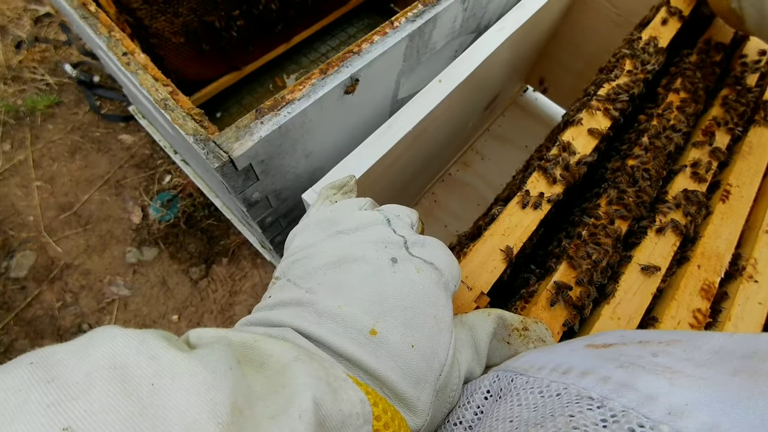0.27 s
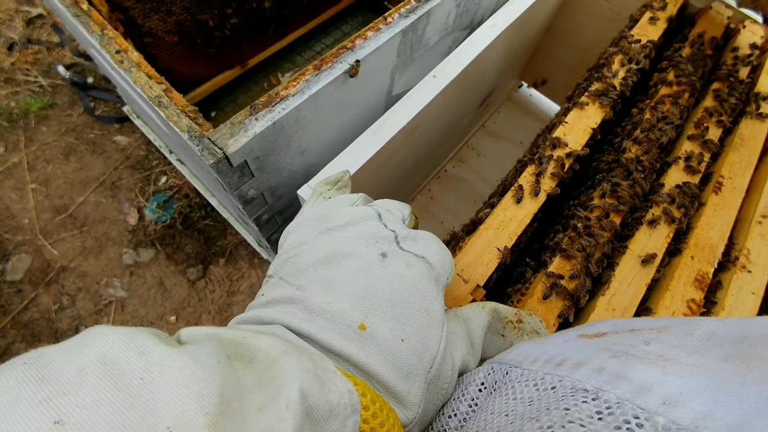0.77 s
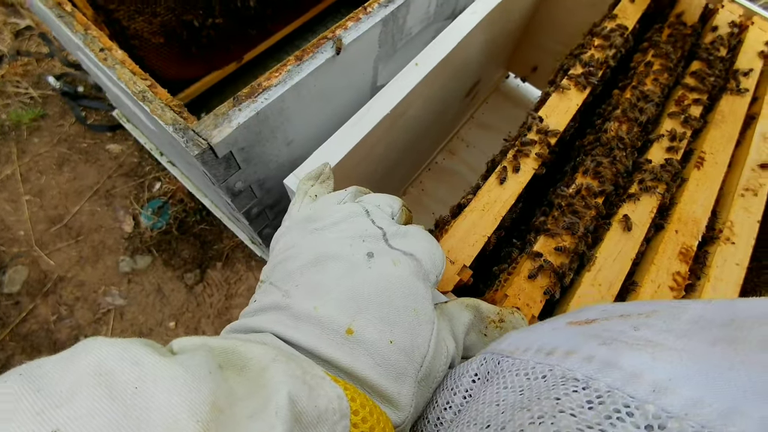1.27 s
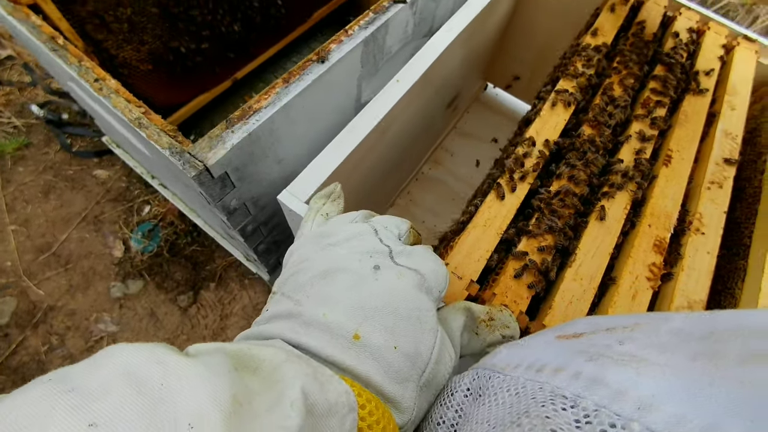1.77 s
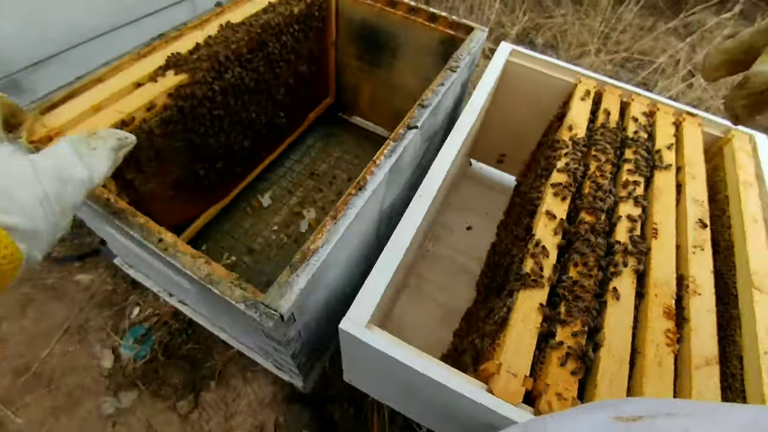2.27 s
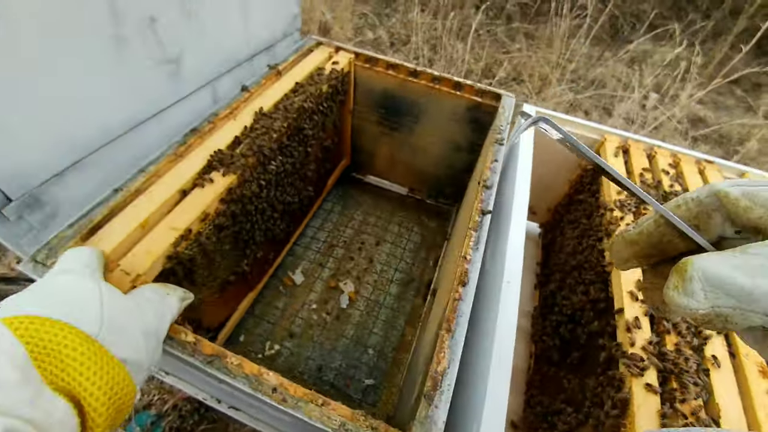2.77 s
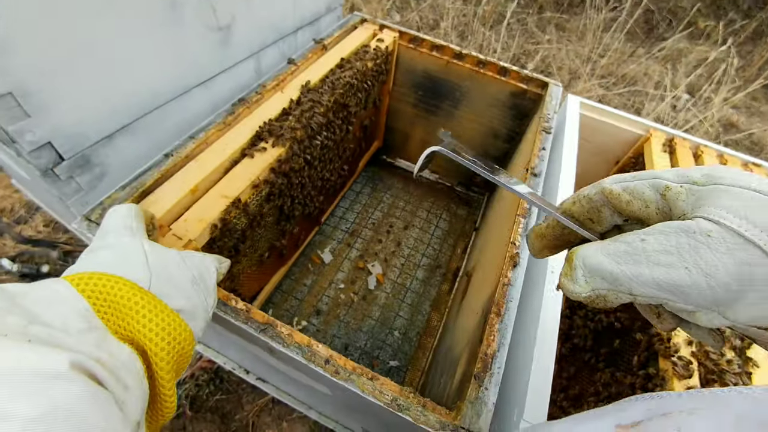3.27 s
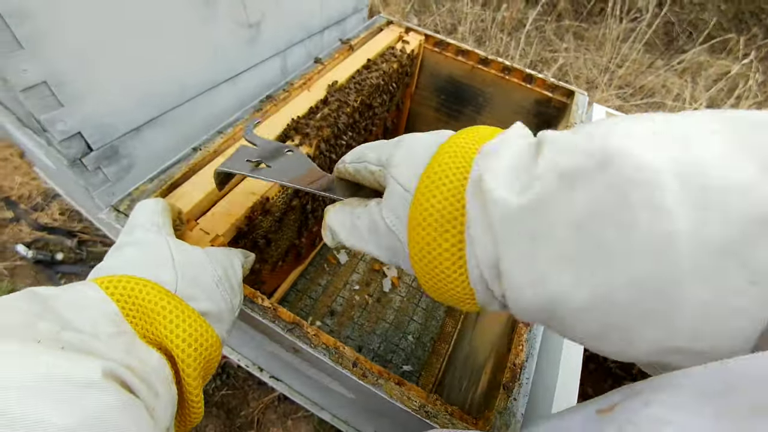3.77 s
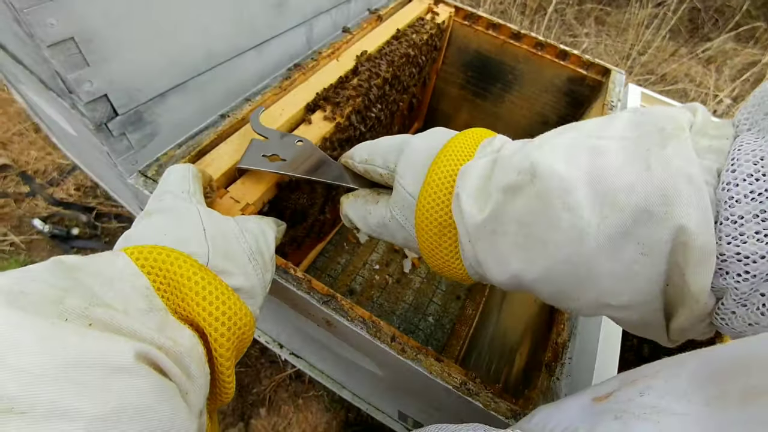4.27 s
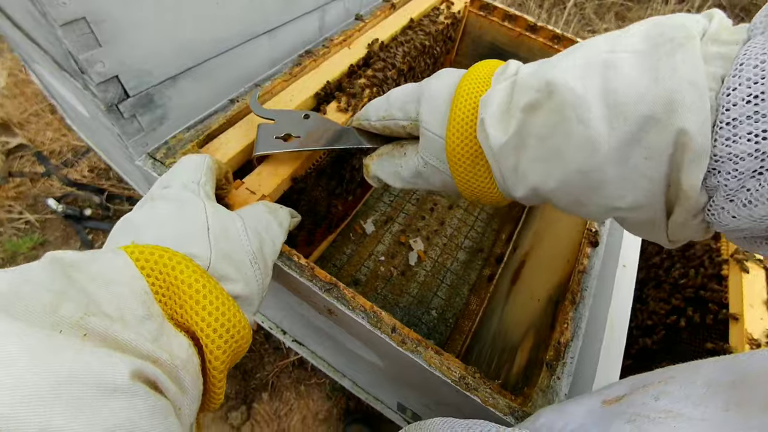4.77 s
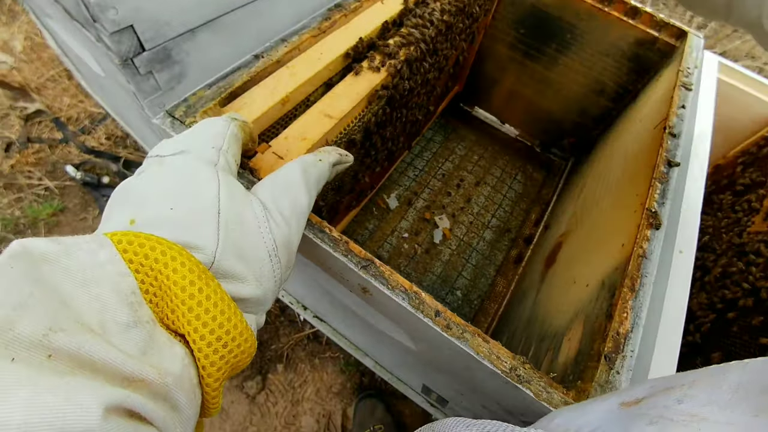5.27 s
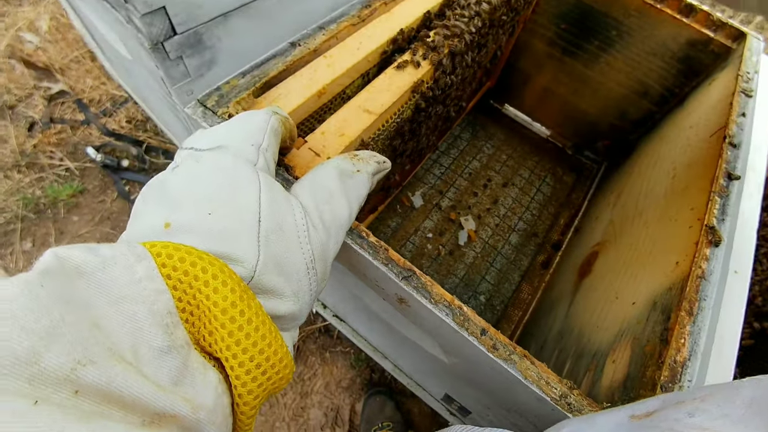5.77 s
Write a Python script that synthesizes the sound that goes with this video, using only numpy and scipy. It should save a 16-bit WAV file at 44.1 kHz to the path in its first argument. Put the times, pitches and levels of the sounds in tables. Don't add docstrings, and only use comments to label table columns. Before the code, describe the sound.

A swarm hums continuously around 200 Hz and its harmonics, close and slightly fluttering, over thin hiss and soft low wind bumps in a dry open field. The hum is boxier during the first two seconds, then more open. At 0.7 s a wooden frame drops into a hollow box: a very loud double hit and quick bounce, flattened by overload, with millisecond high squeals; the treble thins briefly afterward. Soft low thuds settle around 1.6 s, with gloves rustling and small tool ticks near 2.0-2.5 s. Around 2.7-3.4 s come dull bumps and wind puffs, and a bee whizzes very close about 3.0-3.15 s. A long sleeve brush passes at 3.7 s. Gentle prying knocks come at 4.1-4.4 s, then a firm short scrape at 4.6 s and sharper wooden knocks at 4.7-4.8 s. Tiny metallic ticks follow at 5.1-5.3 s, with soft thuds near 5.9 s as bees continue buzzing.

```python
import sys
import numpy as np
from scipy import signal
from scipy.fft import rfft, irfft, next_fast_len
from scipy.io import wavfile
from scipy.ndimage import uniform_filter1d, map_coordinates

SR = 44100
rng = np.random.default_rng(int(sys.argv[2]) if len(sys.argv) > 2 else 0)


def boost_factor(decibels):
    exponent = np.asarray(decibels, float) / 20
    return 10 ** exponent


def persist_wave(psi):
    counts = np.round(np.clip(psi, -1, 1) * 32767).astype(np.int16)
    wavfile.write(sys.argv[1], SR, np.atleast_2d(counts).T)


N = 265217


def unit(x):
    return x / np.sqrt(np.mean(x ** 2) + 1e-20)


def along(points, hz):
    f, v = np.transpose(points)
    return boost_factor(np.interp(np.log(hz + 1), np.log(f + 1), v))


def wobble(rate, count=1):
    knots = rng.standard_normal((count, 400))
    position = np.arange(0, N + 64, 64) * rate / SR
    return np.array([map_coordinates(k, [position]) for k in knots])


def held_for(x):
    return x.repeat(64, axis=-1)[..., :N]


def filtered(x, response):
    m = next_fast_len(N + SR // 2)
    return irfft(rfft(x, m) * response(np.fft.rfftfreq(m, 1 / SR)), m)[:N]


def resonances(modes):
    return lambda f: sum(boost_factor(db) * 1j * f * w / (c * c - f * f + 1j * f * w) for c, w, db in modes)


def rush(spectrum):
    return unit(filtered(rng.standard_normal(N), lambda hz: along(spectrum, hz)))


def ring(modes, rise, scatter_db):
    hz, db, t60 = np.transpose(modes)[:, :, None]
    t = np.arange(int(t60.max() * SR)) / SR
    level = db + scatter_db * rng.standard_normal(hz.shape) - 60 * t / t60
    x = (boost_factor(level) * np.sin(2 * np.pi * hz * t)).sum(axis=0)
    x = x * (1 - np.exp(-t / rise)) ** 2
    return x / np.abs(x).max()


def add(track, s, x):
    part = track[round(s * SR):][:len(x)]
    part += x[:len(part)]


# (frequency [Hz], density [dB per Hz])
HISS_SPECTRUM = [(1760, -32), (3000, -15.5), (3490, -4), (4010, -2.5), (4760, -5), (5820, -10), (7510, -12),
                 (8500, -10.5), (9430, -15.5), (9890, -25), (10700, -15.5), (11400, -18.5), (12000, -30),
                 (12900, -23), (15600, -35.5)]


def hiss():
    return boost_factor(-73.5) * rush(HISS_SPECTRUM)


# (time [s], half length [s], level [dB])
GUST_TIMES = [(0, 0.072, -51), (0.354, 0.21, -69), (.88, 0.15, -54), (1.2, 0.14, -66), (1.8, 0.13, -57),
              (2.204, 0.2, -56.5), (2.6, .1, -59.5), (2.722, 0.032, -46.5), (2.85, .07, -56),
              (3.022, 0.037, -48), (3.17, 0.092, -53.5), (3.367, 0.03, -42), (3.471, 0.065, -54),
              (3.9, 0.16, -61), (4.149, 0.065, -65), (4.417, 0.05332, -52), (4.552, 0.026, -52.5),
              (4.76, 0.058, -52), (4.96, 0.045, -54.5), (5.3, 0.053, -66), (5.998, 0.038, -57)]
# (frequency [Hz], density [dB per Hz])
WIND_SPECTRUM = [(8.8, -31.5), (15, -4.5), (66, -2), (79, -7), (92, -17), (150, -11), (200, -39.5),
                 (330, -120)]


def wind():
    t = np.arange(N) / SR
    breeze_db = -64
    gusts = sum(boost_factor(db) * np.exp(-((t - s) / half) ** 2) for s, half, db in GUST_TIMES)
    flutter = held_for(boost_factor(2.2 * wobble(11)[0]))
    return boost_factor(2.0) * (boost_factor(breeze_db) + gusts) * unit(flutter * rush(WIND_SPECTRUM))


# (time [s], open-air hum level [dB], box boom level [dB])
SWARM_LEVELS = [(0, -51, -44), (.5, -52, -52), (.7, -47, -45), (.8, -53.5, -40.5), (.95, -49.5, -46),
                (1.3, -49.5, -35), (1.55, -49.5, -44), (1.75, -50.5, -41.5), (2.1, -50, -54),
                (2.95, -51, -67), (3.1, -50.5, -52), (3.3, -54, -55.5), (3.55, -52, -63), (3.8, -52.5, -74),
                (4.27, -55.5, -54.5), (4.85, -52, -58), (5.6, -52.5, -62), (6.01, -54, -52)]
# (frequency [Hz], level [dB])
WING_TONE = [(130, -38.5), (190, -15.5), (260, -11.5), (420, -7.5), (640, -20.5), (950, 0.5), (1300, -13),
             (2200, -21.5), (4800, -41.5), (7000, -59.5)]
# (frequency [Hz], density [dB per Hz])
CROWD_SPECTRUM = [(47, -45), (80, -14.5), (93, -20.5), (221, -3), (264, -16), (332, -4.5), (418, -4),
                  (534, -9.5), (963, -14.5), (2080, -28.5), (2790, -42), (4000, -41.5), (5200, -71),
                  (8800, -120)]
# (frequency [Hz], width [Hz], level [dB])
BOX_AIR = [(345, 54, -0.5), (396, 120, -2)]


def swarm(count):
    time, hum_db, boom_db = np.transpose(SWARM_LEVELS)
    hum_db, boom_db = [np.interp(np.arange(N) / SR, time, db) for db in (hum_db, boom_db)]
    own_beat = 0.065 * rng.standard_normal((count, 1))
    drift = 0.045 * wobble(4, count) + 0.014 * wobble(25, count)
    beats = np.cumsum(held_for(210 * (1 + own_beat + drift) / SR), axis=1)
    strokes = np.diff(np.floor(beats + rng.random((count, 1))), axis=1, prepend=0)
    nearness = boost_factor(2.5 * wobble(4, count) + 5.3 * wobble(22, count))
    bees = (strokes * held_for(nearness)).sum(axis=0)
    near = unit(filtered(bees, lambda hz: along(WING_TONE, hz)))
    far = boost_factor(3.5 + 0.43 * held_for(wobble(7.1)[0])) * rush(CROWD_SPECTRUM)
    boxed = unit(filtered(bees, lambda hz: resonances(BOX_AIR)(hz) ** 2))
    return boost_factor(hum_db) * (boost_factor(-2.0) * near + far) + boost_factor(boom_db - 8.0) * boxed


# (start [s], end [s], level [dB])
ARM_MOVES = [(0.658, 1.902, -65.5), (1.89, 2.597, -61.5), (2.85, 3.245, -66.5), (3.45, 4.003, -69),
             (4.505, 5.15, -64.5), (5.3, 6.103, -67.5)]


def movement():
    t = np.arange(N) / SR
    ease_s, still_db = 0.08, -84.5
    strength = boost_factor(still_db)
    for start, end, db in ARM_MOVES:
        strength = strength + boost_factor(db) * (np.tanh((t - start) / ease_s) - np.tanh((t - end) / ease_s)) / 2
    return strength


# (frequency [Hz], density [dB per Hz])
CLOTH_SPECTRUM = [(800, -27), (1500, -3.5), (3000, -8), (4500, -4), (6000, -13), (9000, -16),
                  (10500, -39.5)]
# (time [s], half length [s], level [dB])
SLEEVE_STROKES = [
    (2.408, 0.038, -58),
    (3.147, 0.02962, -55),
    (3.715, 0.13, -53),
]


def clothing():
    t = np.arange(N) / SR
    unevenness = held_for(boost_factor(1.8 * wobble(32)[0] + 1.0 * wobble(8.5)[0]))
    rustle = boost_factor(-7.5) * movement() * unit(unevenness * rush(CLOTH_SPECTRUM))
    strokes = sum(boost_factor(db) * np.exp(-((t - s) / half) ** 2) for s, half, db in SLEEVE_STROKES)
    sleeve = rush([(600, -21), (1300, 12), (2500, -5.5), (5000, -12.5), (7000, -33.5), (9000, -62)])
    return rustle + strokes * sleeve


def tick(hz, t60):
    t = np.arange(int(t60 * SR)) / SR
    band = signal.butter(3, [hz / 1.45, min(hz * 1.22, 9500)], "bandpass", fs=SR, output="sos")
    grit_and_tone = rng.standard_normal(len(t)) + 2 * np.cos(2 * np.pi * hz * t)
    x = signal.sosfilt(band, boost_factor(-60 * t / t60) * grit_and_tone)
    return x / np.abs(x).max()


# (time [s], peak level [dB], ring frequency [Hz])
TICK_TIMES = [(0.25, -57, 7500), (0.658, -39.5, 1340), (0.663, -40, 920), (0.7064, -15.5, 1270),
              (.7082, -21, 1500), (1.488, -41.5, 893), (1.925, -48, 2010), (1.9906, -50.5, 4000),
              (2.021, -45.5, 3900), (2.039, -43, 3490), (2.039, -57, 7850), (2.093, -56, 7700),
              (2.1163, -38, 2050), (2.4978, -43.5, 2270), (2.4995, -61, 4460), (2.690, -36, 950),
              (2.716, -39, 1840), (3.2081, -45.5, 2180), (3.349, -36.5, 850), (3.447, -40, 1096),
              (3.4476, -48.5, 2760), (3.449, -55, 5000), (4.2535, -41, 900), (4.270, -38, 950),
              (4.340, -36.5, 900), (4.367, -36, 950), (4.505, -55, 3524), (5.1432, -49.5, 2880),
              (5.144, -50, 4600), (5.1432, -52, 8000), (5.241, -47.5, 4520), (5.28, -57, 4330),
              (5.2999, -51, 3700), (5.301, -49.5, 4500)]
# (start [s], end [s], level [dB])
SCRAPE_TIMES = [
    (1.605, 1.65, -79),
    (2.012, 2.055, -79),
    (4.574, 4.601, -61.5),
    (4.586, 4.614, -66.5),
]
# (frequency [Hz], width [Hz], half of level [dB])
STEEL_MODES = [(2780, 290, 4.5), (3760, 260, 5.5), (4070, 790, 3.5), (5000, 290, -10), (7500, 824, -5),
               (8300, 770, -7.5)]
# (frequency [Hz], level [dB], t60 [s])
LUG_MODES = [(1500, 6, .015), (1963, 3.5, 0.0215), (2300, -3.5, .02), (2990, -13, .012), (4000, -7, 0.022),
             (5160, -8.5, .02), (6945, -16, 0.016)]
# (frequency [Hz], level [dB], t60 [s])
BLADE_MODES = [(2140, -1.5, 0.14), (4177.8, -15, .15), (4730, -14, 0.13), (6000, -16.5, .15),
               (6941, -8, 0.19), (9070, -15, 0.2), (10245, -21, 0.11), (11200, -18, 0.11)]


def tool():
    out, slips = np.zeros(N), np.zeros(N)
    for s, db, hz in TICK_TIMES:
        add(out, s, boost_factor(db - 1.0) * tick(hz, min(0.01 + 9 / hz, 0.045)))
    for start, end, db in SCRAPE_TIMES:
        n = round((end - start) * SR)
        grains = rng.standard_normal(n) ** 3 / 3
        add(slips, start, boost_factor(db) * np.hanning(n) ** 0.25 * grains)
    add(out, 0.6705, boost_factor(-32.5) * ring(LUG_MODES, 0.00089, scatter_db=3.5))
    n = SR // 20
    blade = ring(BLADE_MODES, 0.0034, scatter_db=3.5)[:n]
    add(out, 0.868, boost_factor(-51) * np.hanning(n) ** 0.444 * blade)
    steel = resonances(STEEL_MODES)
    return out + 3 * filtered(slips, lambda hz: steel(hz) ** 2 / (1 + (hz / 9200) ** 16))


# (closest time [s], level [dB], wing beat [Hz], 20 dB swell [s], 20 dB fade [s])
BEE_PASSES = [(0.095, -49, 213.3, -1.5, -0.03), (0.215, -49, 211.3, 0.17, -0.77),
              (1.37, -52, 207.4, -1, 0.04), (1.92, -47.5, 210.6, .2, 0.2153),
              (2.955, -45, 213.4, 0.24, 0.26), (2.982, -37.5, 220.3, -0.04, -0.03),
              (3.04, -46, 203, .06, 0.5), (3.1, -45, 204, -0.1, -0.1), (3.143, -34.5, 218.3, -0.02, 0.04),
              (3.2, -43.5, 217.1, 0.14, 0.24), (3.24, -52, 215.8, -0.24, 0.35),
              (3.93, -51.5, 215.6, 0.2, -1.7), (4.04, -51.5, 220.7, -0.1, -0.5),
              (5.378, -52, 207, 0.25, -0.1), (5.52, -61, 213.6, 1, 0.2), (5.88, -49.5, 221.5, 0.3, 3),
              (5.987, -45.5, 216.8, 0.04, -1)]
# (multiple of the beat, level [dB])
WING_HARMONICS = [(1, 1), (2, 0), (3, -13), (4, -12.5), (5, -17), (6, -18.5), (7, -20)]


def passer():
    out, t = np.zeros(N + SR), np.arange(-SR // 2, SR // 2) / SR
    pitch_shift = -0.00791
    for s, db, hz, swell, fade in BEE_PASSES:
        away = t / np.maximum(np.abs(np.where(t < 0, swell, fade)), 0.035)
        flutter = 0.01204 * held_for(wobble(40.44)[0])[:len(t)]
        beat = hz * (1 - pitch_shift * np.tanh(away) + flutter)
        phase = 2 * np.pi * np.cumsum(beat) / SR
        wings = sum(boost_factor(level) * np.cos(k * phase) for k, level in WING_HARMONICS)
        add(out, s, boost_factor(db + 1.5 - 20 * np.hypot(away, 0.1)) * np.hanning(len(t)) ** 0.302 * wings)
    return out[SR // 2:][:N]


# (time [s], peak level [dB], main mode
# [Hz], t60 [s])
SOFT_THUDS = [(1.566, -30, 161, 0.07), (1.580, -21, 156.6, 0.092), (1.646, -26, 172.6, 0.077),
              (1.656, -19, 345, 0.11), (1.658, -35, 672, 0.081), (1.664, -24, 178.5, 0.098),
              (2.833, -41, 135.5, 0.072), (3.335, -38, 121, 0.13), (3.348, -29, 119.3, 0.1),
              (3.376, -37.5, 109, 0.12), (4.094, -28, 245, 0.091), (4.702, -21, 229, 0.076),
              (4.702, -32.5, 129, .073), (4.949, -38, 136, 0.073), (5.862, -28, 141, 0.071),
              (5.97, -35.5, 246, .072)]
# (time [s], peak level [dB], main mode [Hz], t60 [s], sharpness [dB])
PRY_KNOCKS = [(2.714, -37.5, 152.4, 0.052, -15), (2.998, -36, 122, 0.28, -8), (4.253, -33, 242, 0.14, -9),
              (4.271, -33.5, 259, 0.18, -7), (4.339, -33, 245, 0.165, -8), (4.367, -43.5, 208, 0.1513, 4),
              (4.381, -34, 200, 0.018, -11), (4.548, -45.5, 159, 0.053, -7), (4.6578, -41, 290, 0.054, 9.5),
              (4.6985, -20.5, 358, 0.084, 8.5), (4.7914, -32.5, 214, 0.17, 4.5),
              (4.803, -42, 133.7, 0.186, 8), (4.821, -34.5, 126, 0.1, -5.5)]
# (frequency [Hz], level [dB], t60 [s])
BOX_MODES = [(71, -6, 0.17), (135.5, 3, 0.116), (200, -2, 0.17), (249.4, -4.5, 0.14), (345, -4, 0.11),
             (413, -9, 0.1), (527, -10, 0.067)]
# (frequency [Hz], level [dB], t60 [s])
STAND_MODES = [(52, -3, .12), (84, 1, 0.086)]
# (frequency [Hz], level [dB], t60 [s])
FRAME_MODES = [(536, -2.5, 0.06), (804, 4.5, 0.042), (872, -5.5, 0.022), (950, -15.5, 0.078),
               (1134, 2, 0.048), (1378, 0, 0.042), (1540, -3.5, 0.042)]
# (frequency [Hz], density [dB per Hz])
CRACK_SPECTRUM = [(250, 3.5), (800, 1), (1400, -2), (2000, -12.5), (3300, -18), (5000, -25), (6100, -48),
                  (8600, -33), (10100, -52), (15000, -78.5)]


def knocks():
    out, t = np.zeros(N), np.arange(SR // 10) / SR
    grit = rush(CRACK_SPECTRUM)
    faint_edge_db = -45
    thuds = [(s, db, hz, t60, faint_edge_db - db) for s, db, hz, t60 in SOFT_THUDS]
    for s, db, hz, t60, sharp_db in thuds + list(PRY_KNOCKS):
        contact_cycles = 0.56 if sharp_db > -14 else 0.94
        modes = [(hz, 9, t60)] + [(f, g, 0.83 * t60 * d / 0.1) for f, g, d in BOX_MODES]
        add(out, s, boost_factor(db) * ring(modes, contact_cycles / hz, scatter_db=3))
        shake = boost_factor(db - 13.5) / (1 + (hz / 125) ** 4)
        add(out, s, shake * ring(STAND_MODES, 0.0035, scatter_db=5))
        add(out, s, boost_factor(db + sharp_db - 3.5) * ring(FRAME_MODES, 0.0024, scatter_db=2.0))
        burst = boost_factor(db + sharp_db - 4.5 - 60 * t / 0.051) * (1 - np.exp(-t / 0.0013))
        add(out, s, burst * grit[round(s * SR / 2):][:len(t)])
    return out


# (time [s], level [dB], direction of push)
DROP_HITS = [
    (0.7074, -6.5, 1),
    (0.7094, 4.5, -1),
    (0.7224, -1, -1),
]
# (frequency [Hz], level [dB], t60 [s])
HOLLOW_MODES = [(58.3, -20.5, 0.083), (138.7, -17.5, 0.033), (176, -1.5, 0.085), (186.25, -12, 0.24),
                (245, -0.5, 0.06), (257.5, -17, 0.14), (336.5, -1, 0.11), (400, 0.5, 0.054),
                (477, -15, .08), (576.5, -11, 0.091), (650, -22, 0.045), (803, -10, 0.032),
                (1128, -25, 0.033), (1208, -20, 0.041), (1290, -25.5, .04), (1544, -31, 0.033),
                (2324, -34.5, 0.041), (3134, -34, 0.037)]


def dropped_frame():
    out = np.zeros(N)
    for s, db, direction in DROP_HITS:
        add(out, s, np.sign(direction) * boost_factor(db + 3.5) * ring(HOLLOW_MODES, 0.00089, scatter_db=1))
    return out


# (release time [s], build-up [s], level [dB], last pitch [Hz])
SQUEAL_TIMES = [
    (0.7128, .0013, -10.5, 13500),
    (.7147, .0018, -11, 8200),
    (.7168, .0011, -23, 10500),
    (.7202, .0011, -20.5, 11500),
    (0.7237, .0012, -14.5, 13400),
    (.7270, .0017, -12, 9000),
    (.7468, .0006, -46.5, 11000),
]


def squeal(held):
    out, t = np.zeros(N), np.arange(-SR // 200, SR // 1000) / SR
    for s, grow, db, hz in SQUEAL_TIMES:
        pitch = hz * (1 + 170 * t + 0.27 * rng.standard_normal(len(t)))
        phase = 2 * np.pi * np.cumsum(pitch) / SR
        size = np.where(t < 0, np.exp(-(t / grow) ** 4), np.exp(-t / 0.00015))
        add(out, s + t[0], boost_factor(db) * size * (np.sin(phase) + 0.4 * np.cos(2 * phase) - 0.6))
    return out * np.tanh(3 * uniform_filter1d(held, size=40))


# (frequency [Hz], level [dB])
DROPOUT_BAR = [(1200, -16.5), (4500, -5), (5800, 0.3), (9000, .4), (10000, -0.8), (15500, 0.7)]


def thinned(x, thinness):
    hz, t, z = signal.stft(x, SR, nperseg=2048)
    short = thinness[np.minimum(t * SR, N - 1).astype(int)]
    size = uniform_filter1d(uniform_filter1d(np.abs(z), size=4, axis=0), size=3, axis=1)
    narrow = uniform_filter1d(np.abs(z), size=3, axis=0)
    lasting = np.exp(uniform_filter1d(np.log(narrow + 1e-9), size=4, axis=1))
    size = np.where(short > 0.3, lasting, size)
    starved = 0.55 * np.clip((hz[:, None] - 900) / 700, 0, 1) * short
    bar = np.minimum(along(DROPOUT_BAR, hz)[:, None] + starved, 1.1)
    fresh = size > 1.7 * np.roll(size, 2, axis=1)
    keep = (size > bar * uniform_filter1d(size, size=40, axis=0)) | fresh
    return signal.istft(z * keep, SR, nperseg=2048)[1][:N]


def scene():
    background = hiss() + wind() + swarm(count=16)
    handling = clothing() + tool() + knocks() + dropped_frame()
    return (background + handling + passer())[None]


def low_pass(x):
    return signal.sosfilt(signal.butter(12, 16630, fs=SR, output="sos"), x)


def record(dry):
    top = 0.82
    loudness = np.abs(dry[0])
    held = dry[0] / (1 + (loudness / top) ** 9) ** (1 / 9)
    excess = np.clip(loudness - 0.81 * top, 0, 0.6)
    capsule = resonances([(5600, 190, -11.0), (6950, 1400, -2.5), (8000, 1200, 1.5),
                          (10300, 1200, -5.0), (11900, 170, -1.0), (14300, 900, -16.5)])
    whistle = unit(filtered(rng.standard_normal(N), capsule))
    build_up = np.clip(signal.lfilter([0.015], [1, -0.985], excess) - 0.15, 0, 1) * (excess > 0)
    held = held + boost_factor(-18) * uniform_filter1d(build_up, size=20) * whistle
    held = np.clip(held, -0.87, 0.87)
    held = held + squeal(held)
    smear_s, smear_db = 0.03, -33
    spread = uniform_filter1d(build_up, size=round(smear_s * SR) * 3 // 2)
    noise = rush([(1500, -30), (3000, -5), (7000, 0), (15000, -3), (15600, -60)])
    held = held + boost_factor(smear_db) * np.sqrt(np.abs(spread)) * noise
    after = np.arange(SR // 2) / SR
    thin_spell = (after > 0.045) * np.exp(-(after / 0.25) ** 3)
    thinness = np.clip(signal.fftconvolve(excess, thin_spell)[:N] / 40, 0, 1)
    mix = filtered(thinned(held, thinness), lambda hz: np.clip((16500 - hz) / 900, 0, 1))
    return low_pass(mix[None])


dry = scene()
out = record(dry)
persist_wave(out)
```